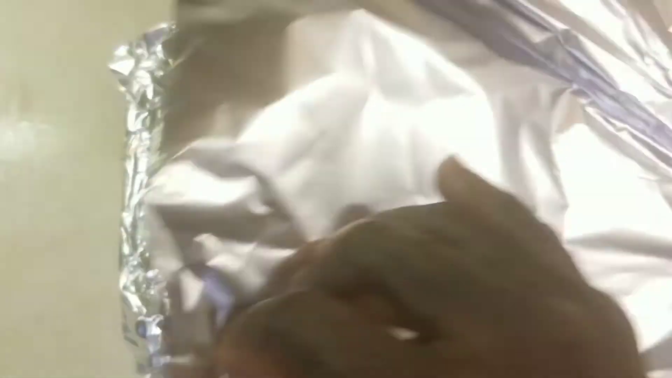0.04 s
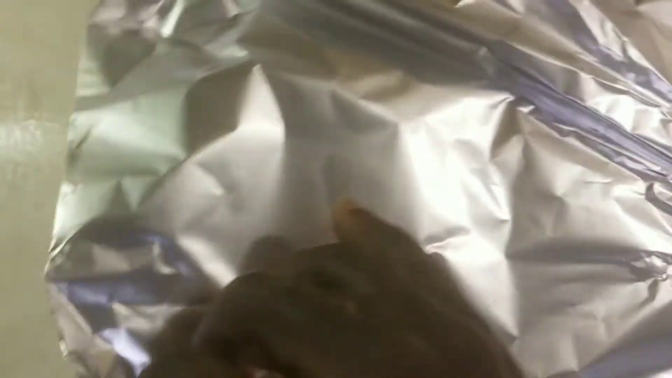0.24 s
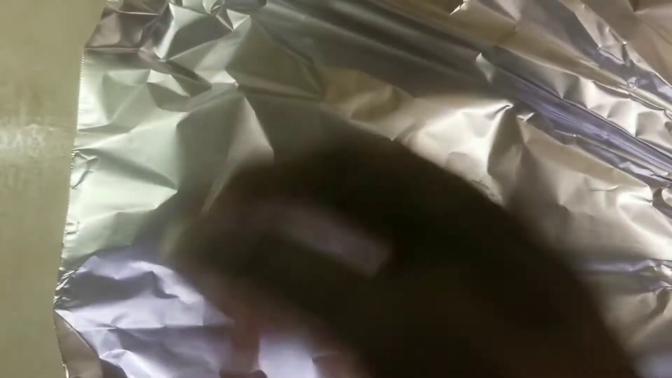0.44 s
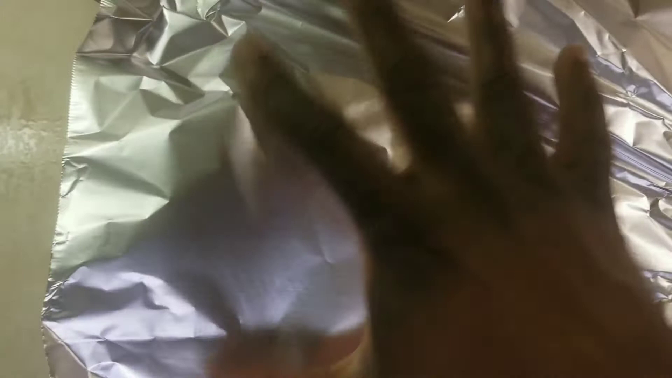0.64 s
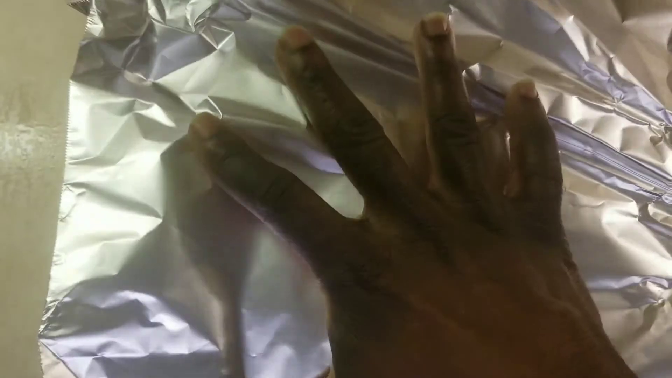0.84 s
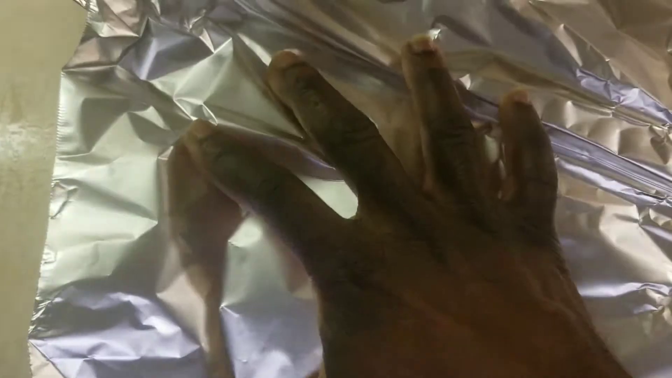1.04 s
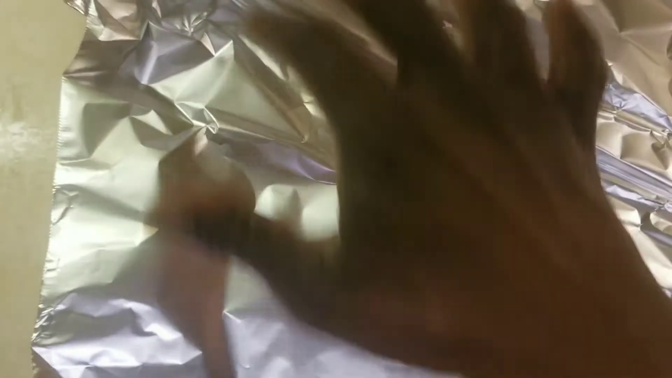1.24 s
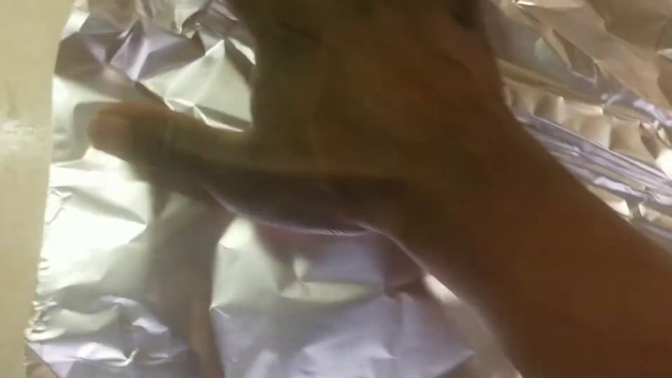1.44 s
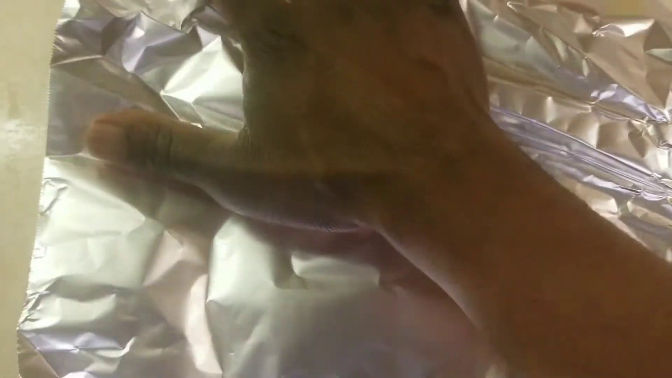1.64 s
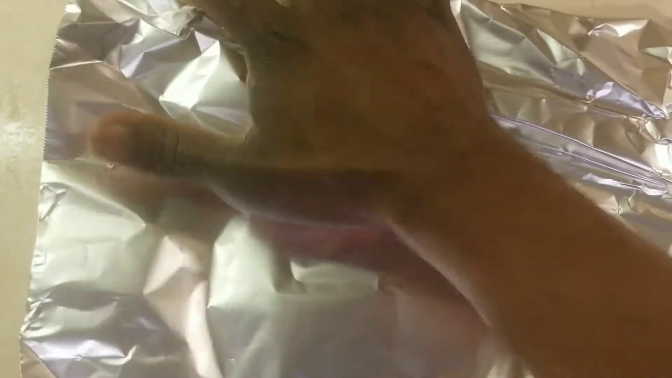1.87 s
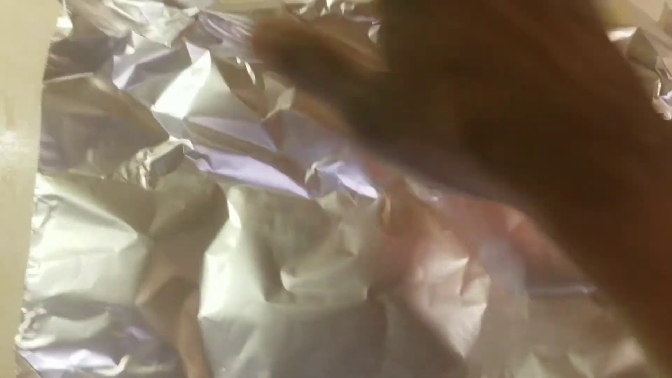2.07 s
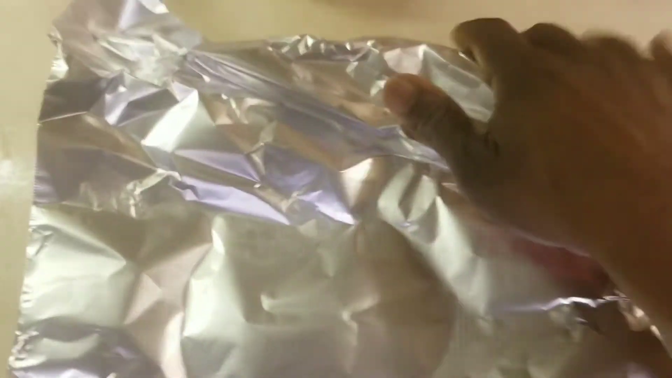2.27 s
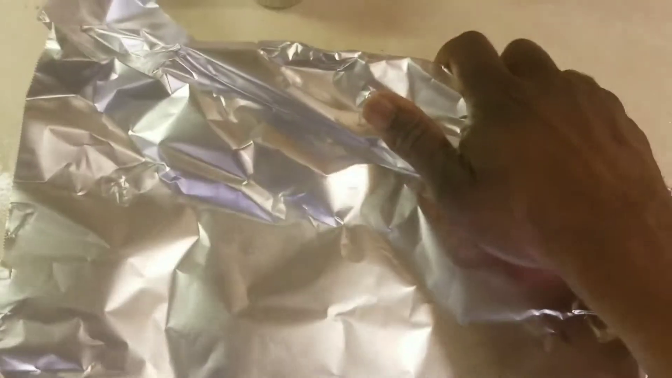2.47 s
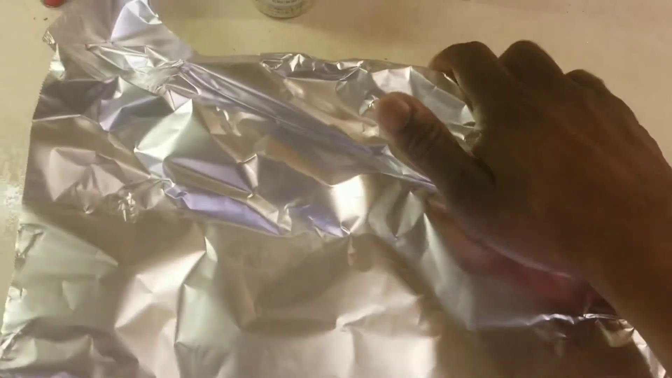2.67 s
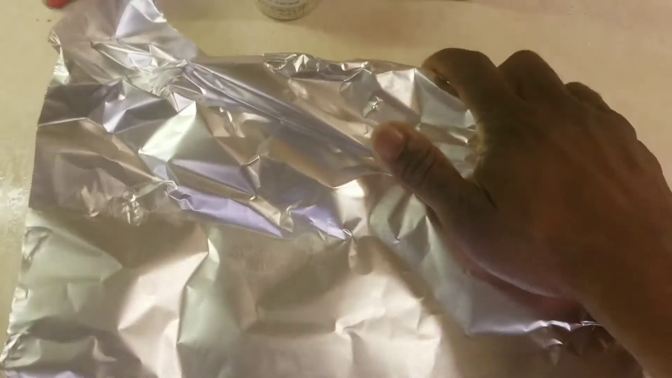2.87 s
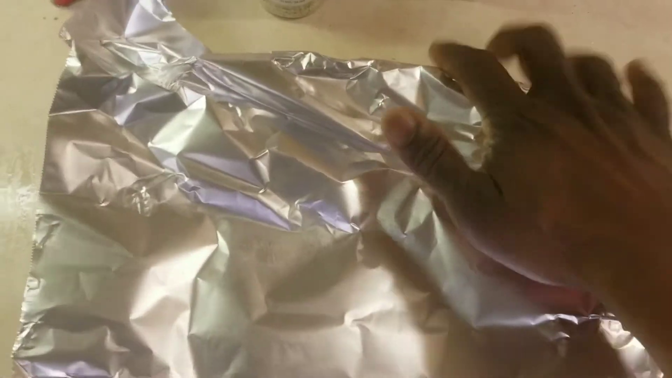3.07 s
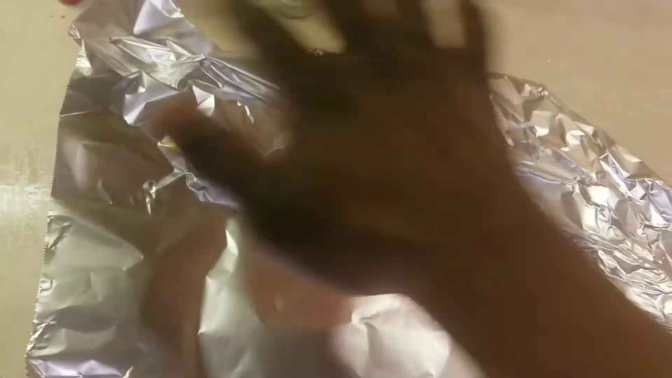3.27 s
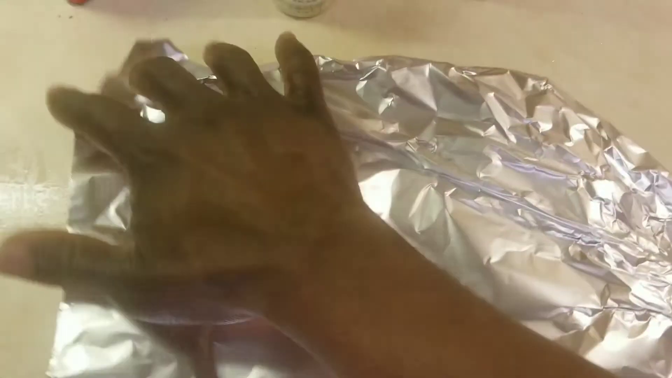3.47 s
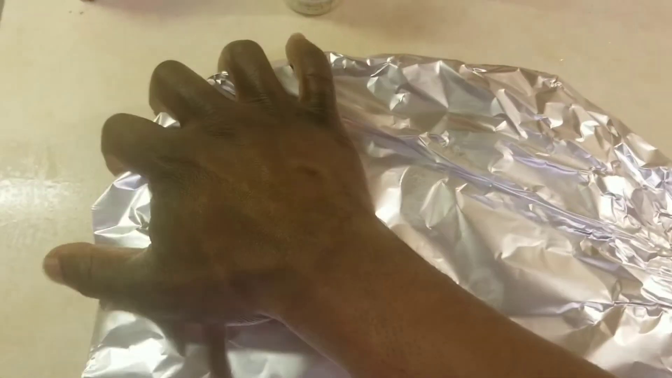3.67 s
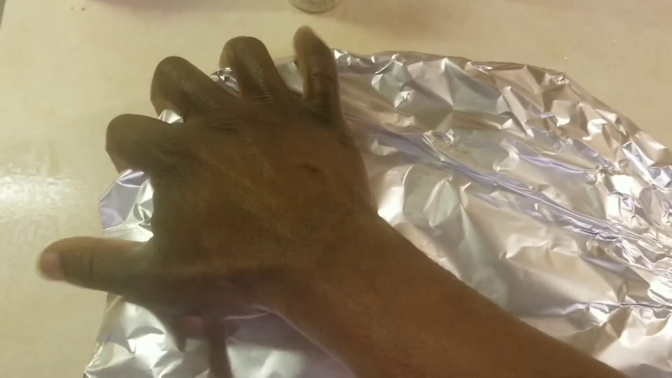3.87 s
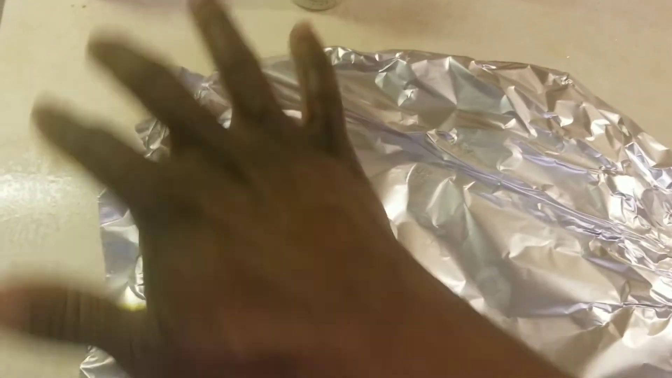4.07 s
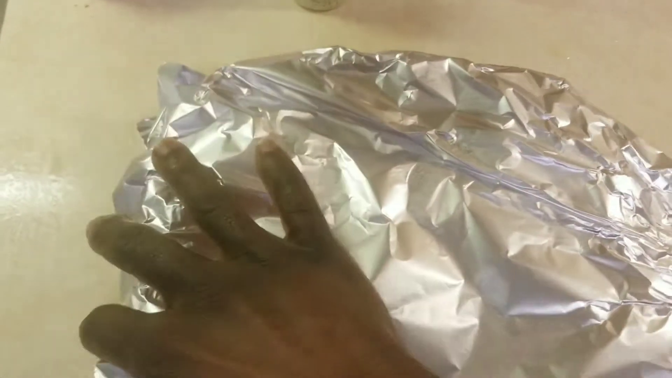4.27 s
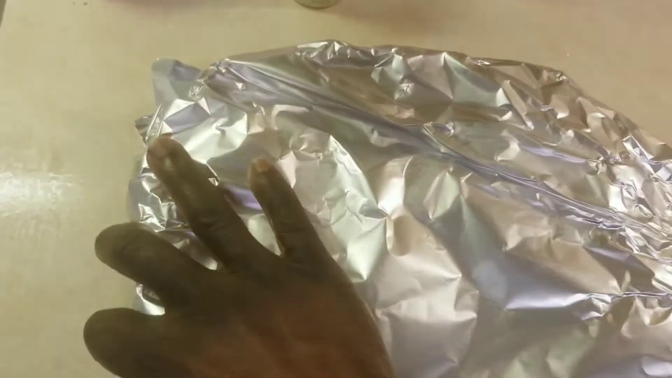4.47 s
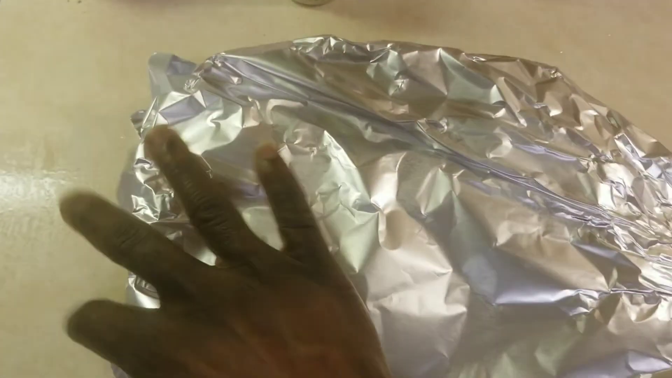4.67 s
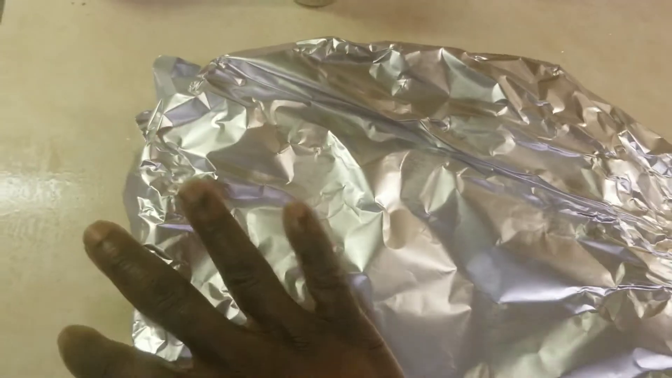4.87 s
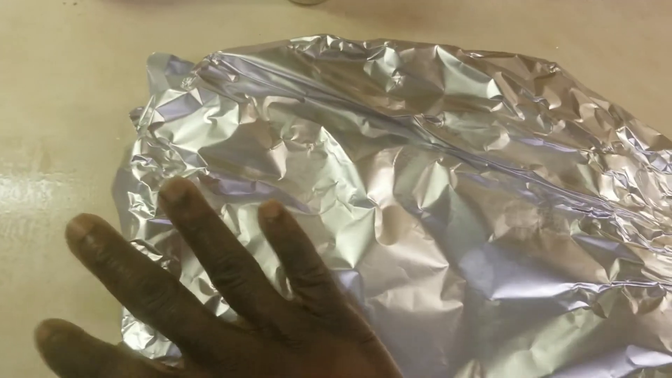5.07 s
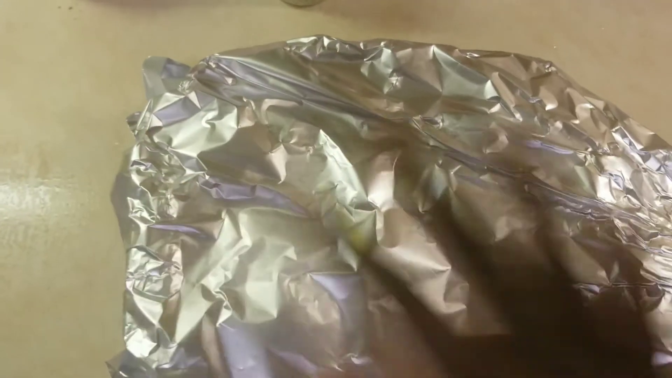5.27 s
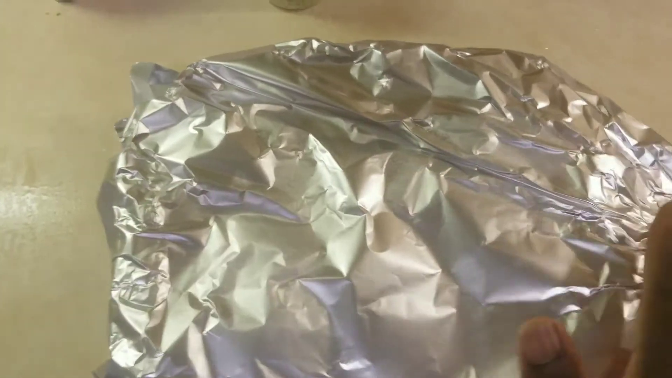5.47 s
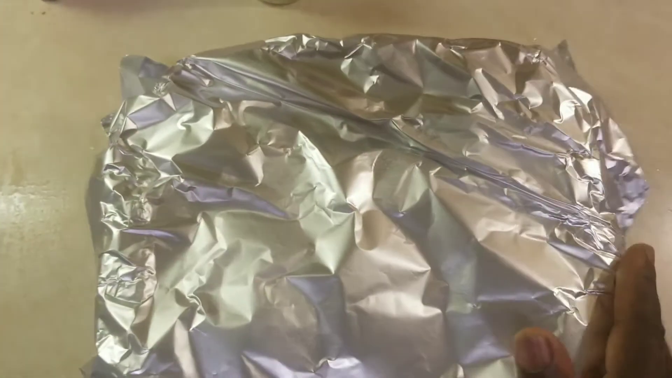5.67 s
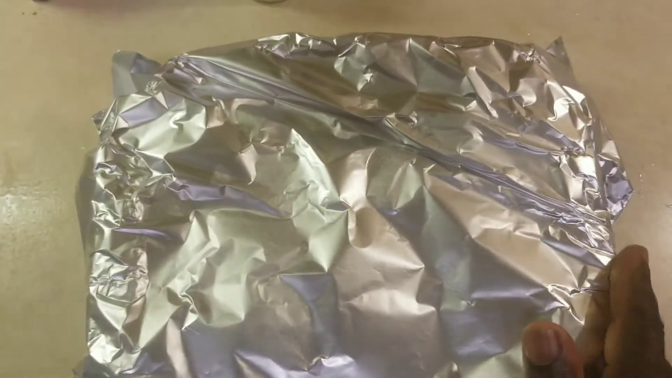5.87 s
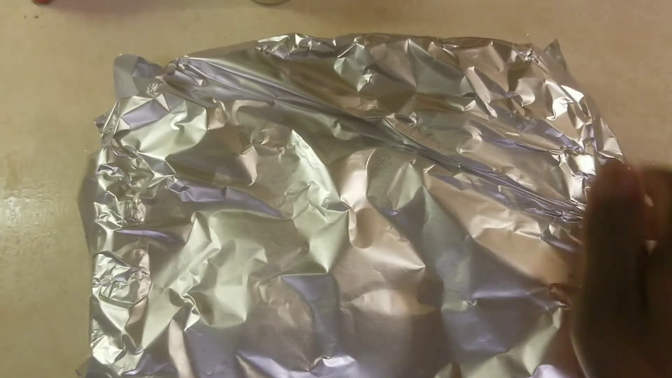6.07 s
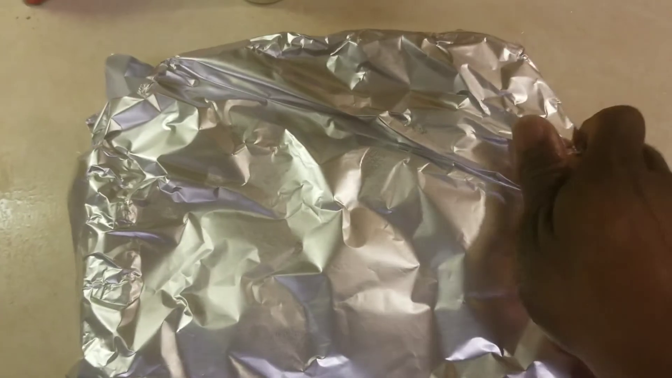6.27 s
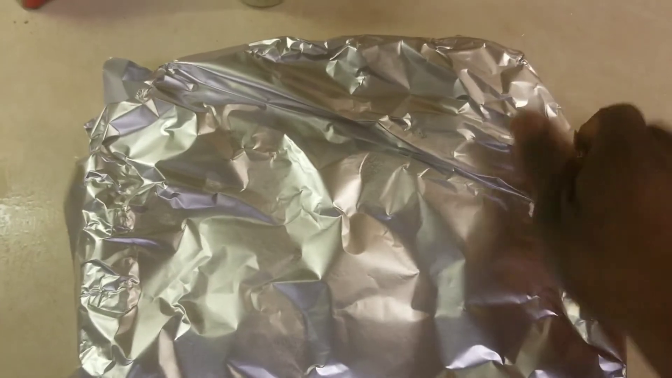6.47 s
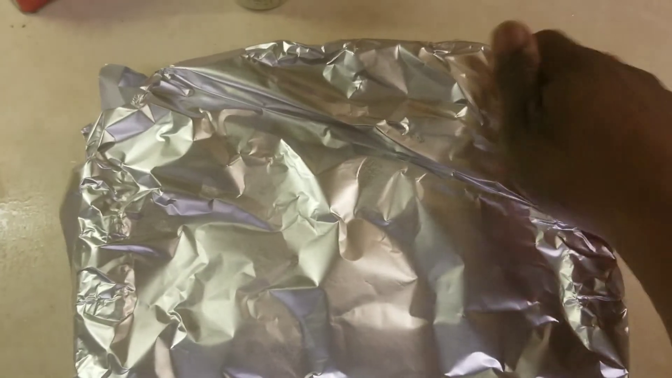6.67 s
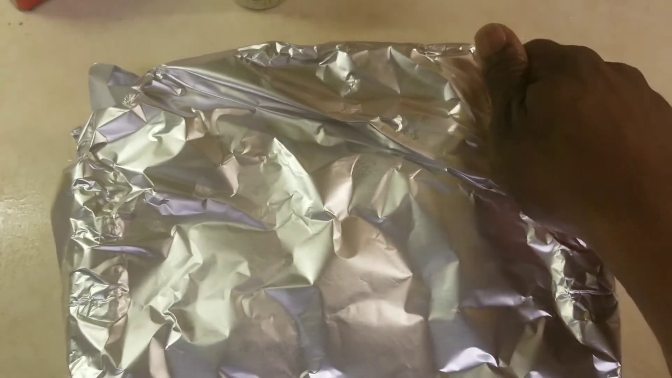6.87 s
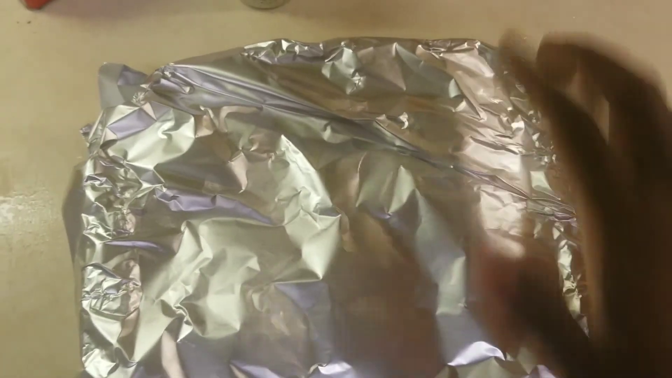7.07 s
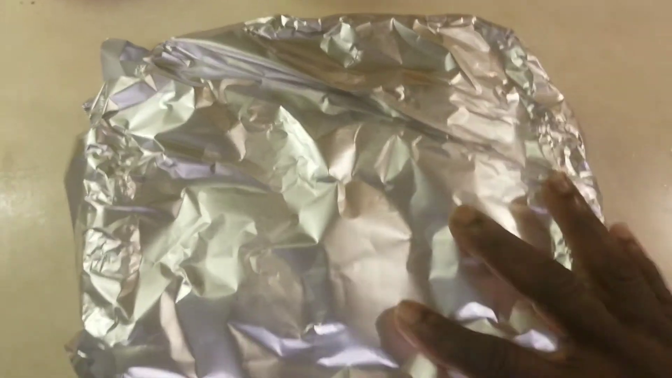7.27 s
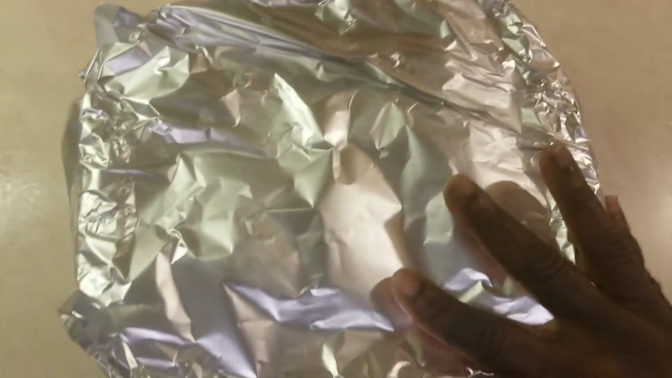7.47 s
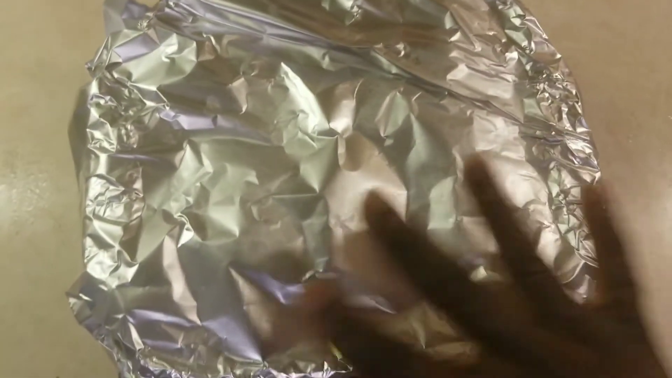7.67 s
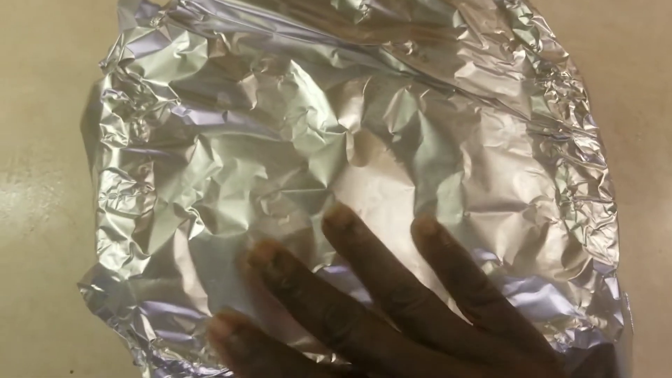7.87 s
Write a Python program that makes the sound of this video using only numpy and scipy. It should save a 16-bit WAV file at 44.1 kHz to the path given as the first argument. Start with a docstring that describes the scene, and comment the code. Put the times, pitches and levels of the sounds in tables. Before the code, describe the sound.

A hand smooths and crimps aluminum foil over a baking pan, close to the microphone. Short crinkly bursts and sharp metallic snaps come irregularly with tiny gaps. From about the middle, dull palm pats give hollow low thumps under the crackle. A small kitchen adds a short reverberation, with very faint hum and hiss beneath.

```python
"""Thin metal crackles in short crumples as a hand presses aluminium foil over a baking pan in a small kitchen.
Crumples are swarms of small damped rings; loud snaps are noise bursts shaped by a facet resonance.
Palm pats sum the decaying modes of the pan with a band of noise, the slap.
Decaying noise convolved with all three is the kitchen's reverberation.
Beneath lie a faint appliance hum of four sines and filtered noise for rumble and hiss."""
import sys
import numpy as np
from scipy import signal
from scipy.fft import rfft, irfft, next_fast_len
from scipy.io import wavfile

SR = 44100
rng = np.random.default_rng(int(sys.argv[2]) if len(sys.argv) > 2 else 0)


def voltage_ratio(level):
    """Linear amplitude factor for a level in decibels (scalar or array-like)."""
    return 10 ** (np.asarray(level, float) / 20)


def bounce(signal):
    """Save signal as a 16-bit WAV file at the path given by the first command-line argument."""
    frames = np.transpose(np.atleast_2d(signal))
    limited = np.clip(frames, -1, 1)
    pcm = np.round(limited * 32767).astype(np.int16)
    wavfile.write(sys.argv[1], SR, pcm)


N = 349686

# Radiation spectrum of the foil. Each row: frequency in Hz, relative level in dB.
FOIL_SPECTRUM = [(35, -74), (60, -23), (212, -22), (323, -13.5), (621, -12.5), (682, -13), (903, -7),
                 (1580, -5), (2250, -1), (2650, -5.5), (3850, -2.5), (5460, -7.5), (6580, -19),
                 (12100, -20), (16000, -25.5)]


def unit(x):
    """Normalisation: x scaled to an rms of 1."""
    return x / np.sqrt(np.mean(x ** 2) + 1e-20)


def along(points, hz):
    """Logarithmic pitch scale: (Hz, value) points joined by straight lines over log frequency."""
    f, v = np.transpose(points)
    return np.interp(np.log(hz + 1), np.log(f + 1), v)


def coloured(x, points):
    """Minimum-phase filtering: the folded cepstrum makes the (Hz, dB) gains causal."""
    m = 2 * next_fast_len(x.shape[-1] // 2 + 4096)
    gain = voltage_ratio(along(points, np.fft.rfftfreq(m, 1 / SR)))
    cepstrum = irfft(np.log(gain), m)
    cepstrum[1:m // 2] *= 2
    cepstrum[m // 2 + 1:] = 0
    response = np.exp(rfft(cepstrum))
    return irfft(rfft(x, m) * response, m)[..., :x.shape[-1]]


def background():
    """Tones and filtered noise: hum and rumble change in level, hiss stays steady."""
    # Hum partials. Each row: frequency in Hz, rms level in dB before the level changes.
    hum_partials = [(118.4, -73), (236.9, -79.5), (360.7, -79.5), (479.1, -84)]
    # Rumble spectrum. Each row: frequency in Hz, relative level in dB.
    rumble_spectrum = [(20, -21), (60, -2), (120, -2), (400, -27), (1000, -42), (3000, -57.5)]
    # Level changes. Each row: time in seconds, rumble rms level in dB, change of the hum in dB.
    level_changes = [(0.0, -94, -19), (1.39, -96, -5), (1.57, -67, 2.5), (4.04, -68, 6),
                     (7.04, -66.5, -2.5), (7.93, -64, 6)]
    # Still air and microphone. Each row: frequency in Hz, relative level in dB.
    hiss_spectrum = [(200, 7), (2000, 11), (5000, 0), (8500, 1), (16000, -3)]
    t = np.arange(N) / SR
    change_s, rumble_db, hum_db = np.transpose(level_changes)
    hum = sum(np.sqrt(2) * voltage_ratio(db) * np.sin(2 * np.pi * hz * t) for hz, db in hum_partials)
    hum = voltage_ratio(np.interp(t, change_s, hum_db)) * hum
    shared, *own = rng.standard_normal((3, N))
    rumble = unit(coloured(shared + 0.21 * np.array(own), rumble_spectrum))  # nearly alike in both ports
    rumble = voltage_ratio(np.interp(t, change_s, rumble_db)) * rumble
    hiss = voltage_ratio(-69.5) * unit(coloured(rng.standard_normal((2, N)), hiss_spectrum))
    return hum + rumble + hiss


def kitchen(x):
    """Reverberation as convolution with decaying noise; the hand moves, so each 0.1 s meets a fresh tail."""
    # Decay of the room. Each row: frequency in Hz, time to fall by 60 dB in seconds.
    room_decay = [(150, 0.35), (700, 0.41), (4000, 0.32), (13000, 0.26)]
    step, delay = SR // 10, 90  # samples
    out = np.zeros((2, N + 2 * SR))
    for start in range(0, N, step):
        hz, t, z = signal.stft(rng.standard_normal((2, SR // 2)), SR, nperseg=256)
        decay = voltage_ratio(-60 * t / along(room_decay, hz)[:, None])
        tail = signal.istft(z * decay, SR, nperseg=256)[1]
        low_difference = signal.lfilter(*signal.butter(1, 1000, fs=SR), tail[0] - tail[1])
        tail[1] += low_difference  # long waves reach both ports alike
        wet = signal.fftconvolve(x[:, start:start + step], tail / np.linalg.norm(tail[0]), axes=1)
        out[:, start + delay:][:, :wet.shape[1]] += wet
    return out[:, :N]


def pats():
    """Modal impact: the palm's dull slap sets the pan's low modes ringing; sharp blows are brighter."""
    # Palm pats. Each row: start in seconds, relative level in dB, sharpness from 0 to 1.
    palm_pats = [(2.797, -34.5, 0.64), (3.54, -23, 0.54), (3.927, -25, 0.26), (4.23, -21, 0.53),
                 (4.711, -28.5, 0.15), (4.836, -18.5, 0.62), (5.113, -32.5, 0.02), (5.567, -21, 0.5),
                 (5.859, -37, 0.1), (7.404, -19.5, 0.64), (7.575, -27, 0.15), (7.793, -15.5, 0.57)]
    # Modes of the pan. Each row: frequency in Hz, nominal level in dB, time to fall by 60 dB in seconds.
    pan_modes = [(110.2, 2, 0.18), (158, 0.5, 0.14), (180.5, -5, 0.2), (243.2, 4.5, 0.18), (339, -8, 0.3),
                 (439, -7, 0.2), (502, 6.5, 0.047), (595, 1, 0.094), (901, -6, 0.07)]
    out, t = np.zeros(N + SR), np.arange(SR // 2) / SR
    for start_s, db, sharp in palm_pats:
        ring = np.zeros(len(t))
        for hz, level, t60 in pan_modes:
            drift = 0.014 * np.cumsum(rng.standard_normal(len(t)))  # the resting hand roughens each mode
            level = level + rng.normal(0, 1.4) + 14 * (sharp - 0.5) * np.log2(hz / 250)
            swell = 1 - np.exp(-t * hz / 0.37)  # low modes take longer to build
            ring += swell * voltage_ratio(level - 60 * t / t60) * np.sin(2 * np.pi * hz * t + drift)
        noise = rng.standard_normal(len(t)) * voltage_ratio(-60 * t / 0.2)
        click = 6 * voltage_ratio(-60 * t / 0.0014)
        band_hz = [120, 500 + 900 * np.clip(sharp, 0, 1)]
        slap = signal.lfilter(*signal.butter(2, band_hz, "band", fs=SR), noise + click)
        out[round(start_s * SR):][:len(t)] += voltage_ratio(db - 10.5) * (ring + 6 * sharp ** 2 * slap)
    return signal.lfilter(*signal.butter(2, 80, "high", fs=SR), out[:N])


def snaps():
    """Snap-through buckling: a big facet flips, a brief burst strongest near the facet's own pitch."""
    # Loud buckles. Each row: start in seconds, peak level in dB, facet pitch in Hz, treble boost in dB.
    loud_buckles = [(0.182, -29, 2660, -8), (0.697, -14, 5700, 7), (0.7563, -17.5, 5600, 10),
                    (0.972, -28.5, 3860, 6), (1.0184, -21.5, 5400, 7), (1.3871, -23.5, 1500, -10),
                    (1.4249, -19, 1480, 2), (1.453, -16, 3100, 10), (1.642, -21, 3400, 4),
                    (1.6701, -18, 3300, -8), (1.729, -25, 4500, 12), (1.8089, -22, 2500, -3),
                    (1.8744, -17.5, 2230, -8), (2.2112, -24, 2230, -4), (2.272, -24, 1500, -6),
                    (2.385, -20.5, 1840, 3), (2.3966, -18, 2420, -1), (2.448, -17, 1650, -23),
                    (2.5067, -18.5, 1930, -0.5), (2.8, -22, 2400, -6), (2.812, -11.5, 1980, 2),
                    (3.3275, -28.5, 2200, -18.5), (3.39, -24, 3000, 3), (3.485, -14.5, 1810, -6),
                    (3.5142, -12.5, 2780, 2), (3.659, -22, 1750, -7), (3.7345, -17.5, 2240, 5),
                    (4.1907, -25.5, 1900, 1), (4.3726, -12, 3940, 6.5), (4.4281, -21, 2200, 2),
                    (4.6157, -18.5, 1970, 0), (4.6953, -20, 4430, 2.5), (4.8359, -19, 1480, -12),
                    (4.8783, -18, 3620, 6), (5.05, -18.5, 3440, 4), (5.116, -25.5, 3280, 9),
                    (5.4334, -20.5, 3550, 5), (5.4703, -16.5, 3340, 2.5), (5.54, -19, 2820, 7),
                    (5.7426, -14, 3700, 4), (5.8328, -25.5, 1680, -19), (5.985, -32.5, 1800, -8),
                    (6.0866, -27.5, 1170, -13), (6.2216, -12, 2010, -2), (6.3827, -27.5, 2630, -2),
                    (6.4345, -23.5, 1510, -2), (6.4774, -20, 2700, 1), (6.6486, -14.5, 1700, 1.5),
                    (6.701, -27.5, 2200, -2), (6.7646, -20.5, 2170, 4), (6.8851, -17, 2100, 8),
                    (6.9091, -26, 2090, 23), (7.2155, -29.5, 3500, -3), (7.2598, -19.5, 3400, -7),
                    (7.335, -23, 4530, 20), (7.3664, -33, 3500, 1), (7.3995, -24, 1710, -5),
                    (7.4883, -29.5, 3550, -1), (7.5344, -24.5, 2340, 5), (7.7744, -13.5, 1980, -4),
                    (7.8276, -18, 3500, -1), (7.885, -15.5, 4830, -3), (7.922, -22, 3800, 4)]
    out, t = np.zeros((2, N + SR)), np.arange(2048) / SR
    f = np.fft.rfftfreq(len(t), 1 / SR)
    sheet = voltage_ratio(along(FOIL_SPECTRUM, f))
    treble_share = f ** 4 / (f ** 4 + 6000 ** 4)
    unlike = 0.96 * f / (f + 900)  # the ports agree less as frequency rises
    lead = np.exp(-2j * np.pi * f * 0.00012)  # the left port hears it first, by 0.12 ms
    for start_s, db, hz, treble_db in loud_buckles:
        t60 = 0.022 * voltage_ratio(0.34 * (db + 22))  # 22 ms at -22 dB; bigger facets rattle longer
        shape = voltage_ratio(-60 * t / t60) * (1 - np.exp(-t / (0.073 * t60)))
        near, other = rfft(shape * rng.standard_normal((2, len(t))))
        right = np.sqrt(1 - unlike ** 2) * near * lead + unlike * other
        body = np.array([near, right])
        soft_shape = shape * (1 - np.exp(-t / 0.0011))  # the treble sets in more softly than the body
        treble = rfft(soft_shape * rng.standard_normal((2, len(t))))
        facet = 0.5 + 1j * f * 0.35 * hz / (hz * hz - f * f + 1j * f * 0.32 * hz)
        spectrum = body * facet * (1 - treble_share) + treble * voltage_ratio(treble_db) * treble_share
        burst = irfft(sheet * spectrum, len(t))
        out[:, round(start_s * SR):][:, :len(t)] += voltage_ratio(db) * burst / np.abs(burst.mean(0)).max()
    return out[:, :N]


def creases(count, size, lo_hz, hi_hz, cycles, spread_db, lag_s, clump_s):
    """Superposed damped oscillations: a stereo swarm of creases, each delayed by its spot on the sheet."""
    # creases give way in runs of eight
    when, pitch, luck, spot = np.repeat(rng.random((count // 8, 4)), 8, 0).T[:, :, None]
    late, detune, share = rng.random((len(when), 3)).T[:, :, None]
    when = (when + clump_s * SR / N * late ** 2) % 1
    pitch = (pitch + 0.35 * detune) % 1  # a run keeps roughly one colour
    luck = np.sqrt(luck * share)
    hz = lo_hz * (min(hi_hz, SR / 2.2) / lo_hz) ** pitch
    life_s = np.minimum(cycles / hz, size / 4 / SR)
    gain = np.sqrt(hz / life_s) * voltage_ratio(-spread_db * np.log(luck + 0.03))  # many small, few big
    where = (when * N).astype(int) + np.arange(size)
    pair = []
    for lag in (0.6 * lag_s * spot, lag_s * (1 - spot)):  # the left port is nearer
        t = np.maximum(np.arange(size) / SR - lag, 0)
        ring = gain * np.exp(-t / life_s) * np.sin(2 * np.pi * hz * t)
        pair.append(np.bincount(where.ravel(), ring.ravel(), N + size)[:N])
    return unit(coloured(np.array(pair), FOIL_SPECTRUM))


def crackle():
    """Crackling noise of a squeezed sheet: size sets pitch, so fine crimps fizz and wide panels flap low."""
    # Crumples under the fingers. Each row: start in seconds, length in seconds, crackle level in dB,
    # swell over the length in dB, fizz relative to the crackle in dB.
    crumples = [(0, 0.14, -28.5, -28, -1), (0.166, 0.086, -36, -11.5, -4), (0.254, 0.098, -29.5, -3, 0.5),
                (0.407, 0.11, -43.5, -11.5, -20), (0.647, 0.025, -55, 4, 2), (0.669, 0.049, -34, 5, 0),
                (0.742, 0.13, -40, 10, 3.5), (0.956, .065, -37.5, 0, -4), (1.034, 0.043, -33, -3, 4),
                (1.094, 0.084, -40, 0, -15), (1.344, .03, -56, 6.5, -3), (1.368, 0.076, -30.5, 1, -5.5),
                (1.453, .15, -37.5, -2, 3.5), (1.61, 0.12, -40, -2, 3.5), (1.789, 0.095, -38.5, -0.5, 0.5),
                (2.008, 0.031, -53, 4.5, -32), (2.182, 0.018, -46.5, 4.5, -22), (2.21, 0.049, -29, -7.5, 3),
                (2.261, 0.14, -33.5, -3.5, -2), (2.43, .1, -38.5, -2.5, -10.5),
                (2.593, 0.076, -43, -10.5, 8.5), (2.65, 0.037, -32, 1, -8), (2.786, 0.097, -27, -7, -3),
                (2.906, .025, -34, -1.5, -6), (2.987, 0.045, -36.5, 2, -0.5),
                (3.036, 0.062, -36, -10, -3.5), (3.315, 0.048, -48, 7.5, -15), (3.368, 0.087, -38, 6.5, 1),
                (3.454, 0.16, -25.5, -7.5, -3.5), (3.599, 0.09, -39, 1.5, -8.5),
                (3.812, 0.08, -36, 2.5, -5.5), (3.888, 0.029, -23.5, -7, 0.5),
                (3.977, 0.023, -36.5, -3, -12), (4.17, 0.11, -36.5, 7.5, -8.5),
                (4.252, 0.076, -32.5, -10, -2.5), (4.331, 0.073, -33, 6.5, 0),
                (4.418, 0.077, -33, -4.5, -5), (4.564, .03, -46.5, 4, -10), (4.59, 0.051, -33, 3, -7),
                (4.692, 0.046, -40.5, 5, -7), (4.792, 0.025, -45.5, 6, -17),
                (4.818, 0.068, -28.5, -2.5, -4.5), (5.005, 0.027, -41, -1.5, -7),
                (5.055, 0.048, -35.5, -4.5, -5.5), (5.081, 0.13, -37, -17, -5.5),
                (5.364, 0.072, -36, -7, -10.5), (5.437, 0.14, -34.5, 3, -5.5),
                (5.588, 0.043, -30.5, -2, -0.5), (5.656, 0.044, -38.5, 2, -8.5), (5.754, 0.16, -44, -2, -5),
                (5.868, 0.054, -36, -1, -11), (6.094, 0.076, -37, -2, -8), (6.191, 0.046, -31, 2, -5),
                (6.25, 0.049, -40.5, -4, -1), (6.368, 0.086, -44, 9, -10), (6.459, 0.036, -31.5, -13.5, 8),
                (6.602, 0.022, -50.5, 13.5, -12), (6.631, 0.15, -28.5, -10.5, -5),
                (6.742, 0.057, -35.5, -5.5, -12), (6.845, 0.031, -42, 6, -4),
                (6.873, 0.029, -33.5, 0, -1.5), (6.902, 0.028, -29, 1, -6), (7.189, 0.023, -57, 5, -8),
                (7.217, 0.063, -33.5, 3, -3.5), (7.295, 0.094, -29.5, -8, -14), (7.482, 0.042, -40, 4, -9),
                (7.515, 0.068, -34.5, -4.5, -5.5), (7.595, .16, -46, -8.5, -27),
                (7.752, 0.22, -34.5, -5.5, -6)]
    # Wide panels. Each row: time in seconds, flap relative to the crackle in dB.
    flap_levels = [(0, -10), (1.3, -6), (2.2, -6.5), (4.2, -13), (5.202, -10), (6.2, -6), (7.0, -12.5),
                   (7.93, -13.5)]
    grip_s, grip_power, let_go_s = 0.017, 1.29, 0.008  # a crumple swells from a faint stir, and stops
    body = creases(count=8000, size=200, lo_hz=1225, hi_hz=5570, cycles=2.9,
                   spread_db=3.5, lag_s=0.00038, clump_s=0.02)
    fizz = creases(count=30000, size=64, lo_hz=6070, hi_hz=15360, cycles=16.0,
                   spread_db=2.5, lag_s=0.00032, clump_s=0.025)
    flap = creases(count=4000, size=512, lo_hz=153, hi_hz=1284, cycles=1.36,
                   spread_db=0.5, lag_s=0.00004, clump_s=0.06)
    flap = flap * voltage_ratio(np.interp(np.arange(N) / SR, *np.transpose(flap_levels)))
    out = np.zeros((2, N))
    for start_s, length, db, swell_db, fizz_db in crumples:
        on = slice(round(start_s * SR), round((start_s + length + 5 * let_go_s) * SR))
        t = np.arange(N)[on] / SR - start_s
        grip = np.clip(t / grip_s, 0, 1) ** grip_power if start_s else 1  # the first is already under way
        release = np.exp(-np.maximum(t - length, 0) / let_go_s)
        shape = grip * voltage_ratio(db + swell_db * t / length) * release
        out[:, on] += shape * (body[:, on] + voltage_ratio(fizz_db) * fizz[:, on] + flap[:, on])
    return out


def scene():
    """Superposition: foil and pan heard directly and through the room, over the background."""
    rustle, flips, pan = crackle(), snaps(), pats() * np.ones((2, 1))
    to_room = voltage_ratio(-3.0) * rustle + voltage_ratio(-4) * flips + voltage_ratio(-5) * pan
    return rustle + flips + pan + kitchen(to_room) + background()


def top_cut(x):
    """Nothing passes above the cut-off."""
    return signal.sosfilt(signal.butter(12, 16480, fs=SR, output="sos"), x)


def record(dry):
    """Receiver response: two ports of unequal sensitivity, with almost nothing above 16.3 kHz."""
    # Imbalance of the microphone ports. Each row: frequency in Hz, left minus right in dB.
    port_lean = [(30, 11.5), (70, 1), (200, 1.5), (640, 0), (1410, 6), (3100, 8), (6820, -0.5),
                 (15000, -2.5)]
    left = coloured(dry[0], [(hz, db / 2) for hz, db in port_lean])
    right = coloured(dry[1], [(hz, -db / 2) for hz, db in port_lean])
    low_pass = signal.cheby2(12, 50, 16300, fs=SR, output="sos")
    pair = signal.sosfilt(low_pass, [left, right])
    return top_cut(pair)


dry = scene()
out = record(dry)
bounce(out)
```